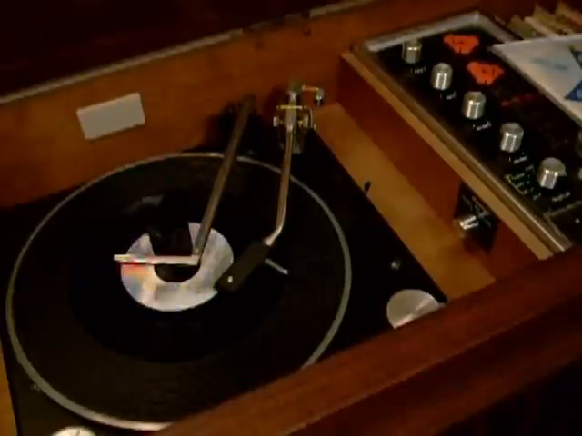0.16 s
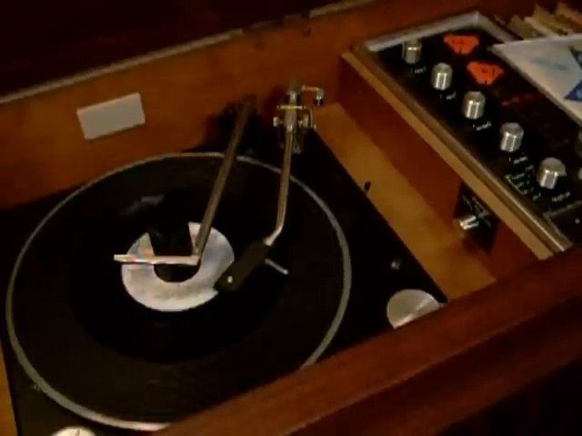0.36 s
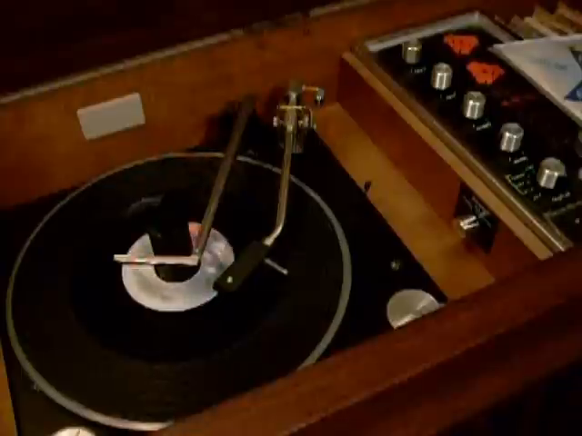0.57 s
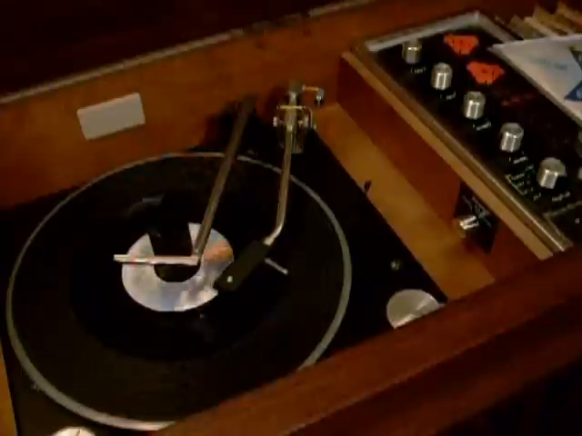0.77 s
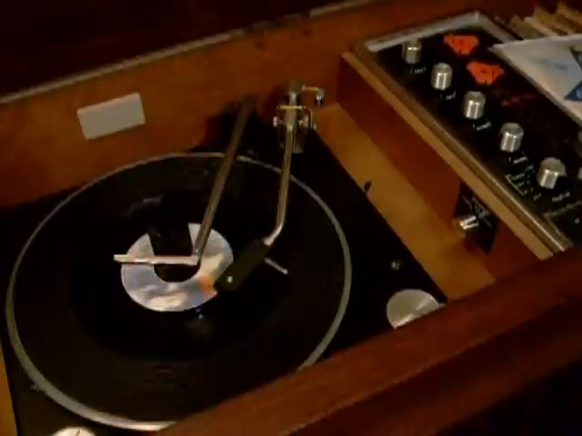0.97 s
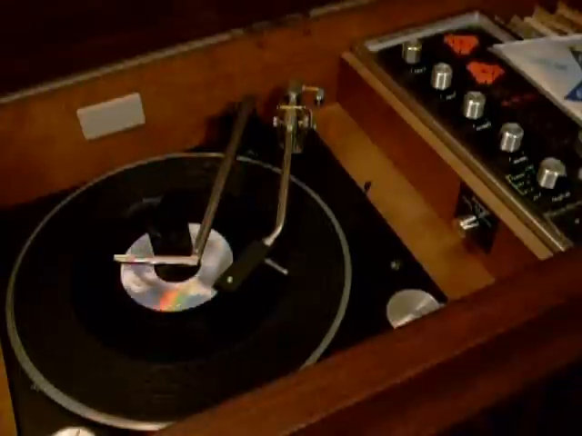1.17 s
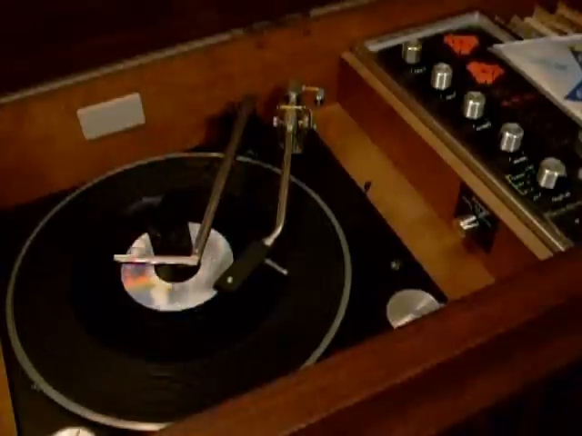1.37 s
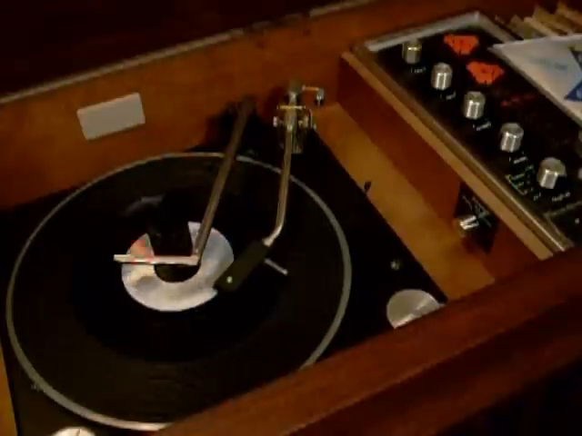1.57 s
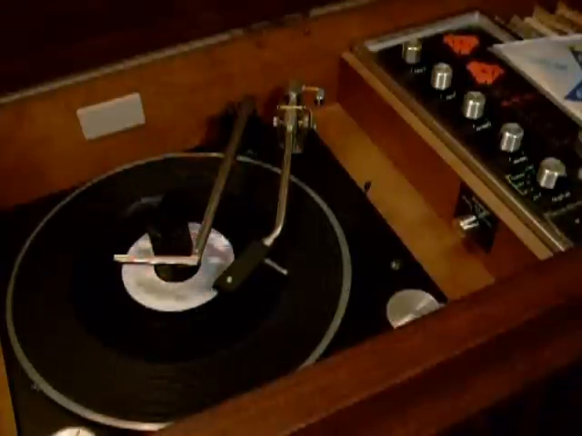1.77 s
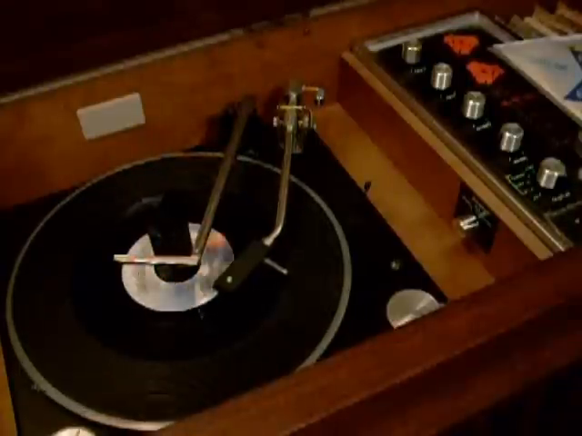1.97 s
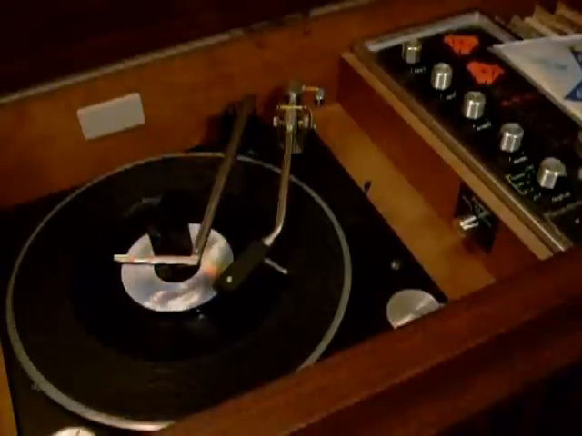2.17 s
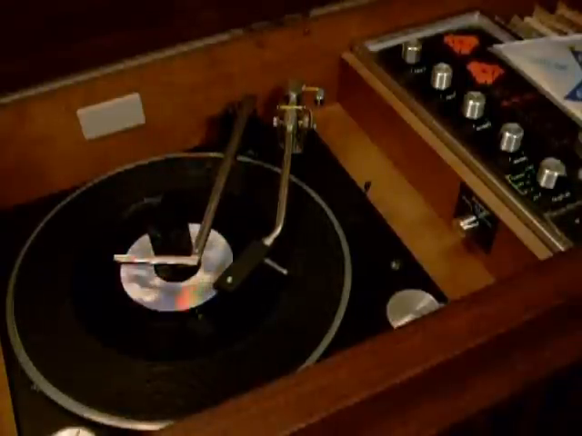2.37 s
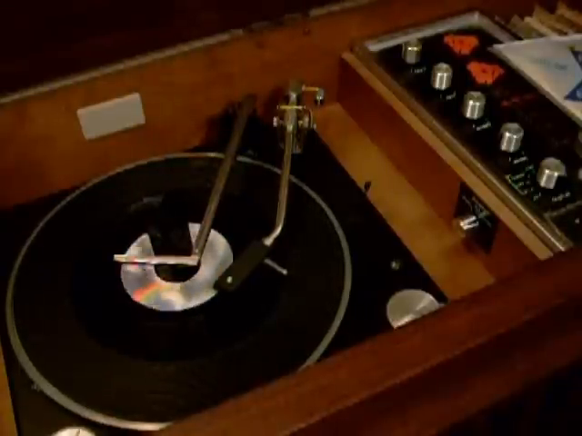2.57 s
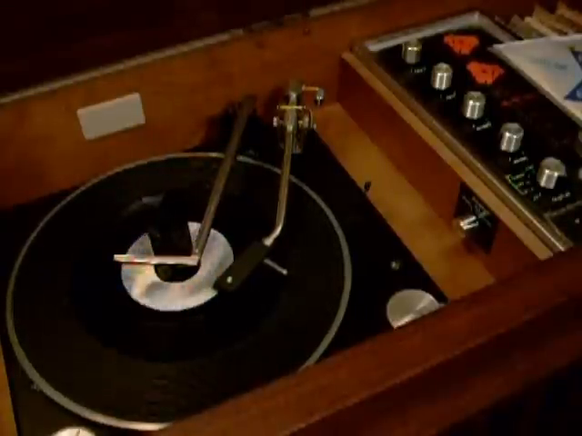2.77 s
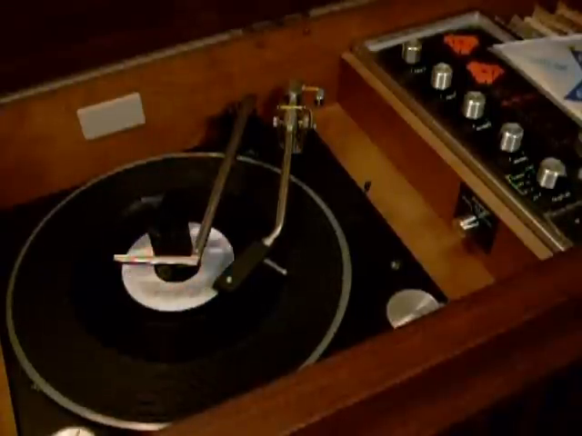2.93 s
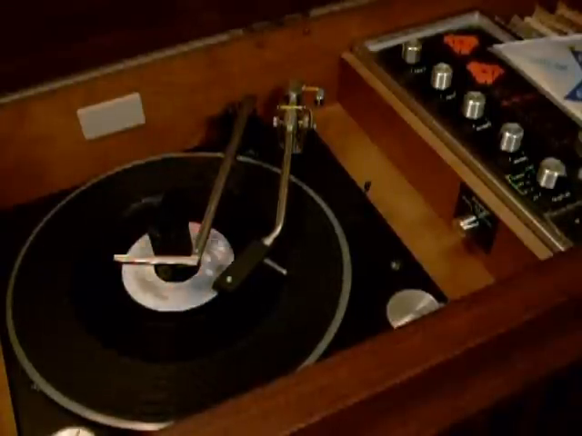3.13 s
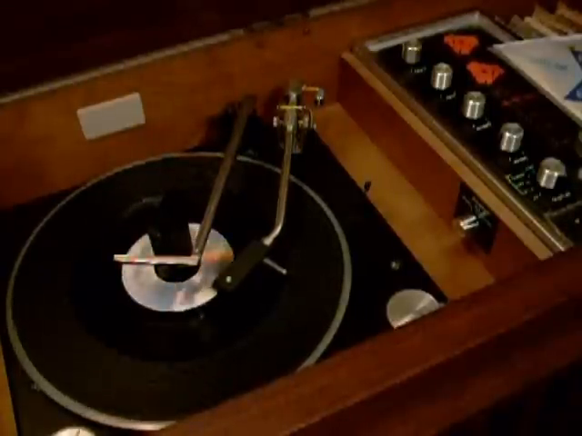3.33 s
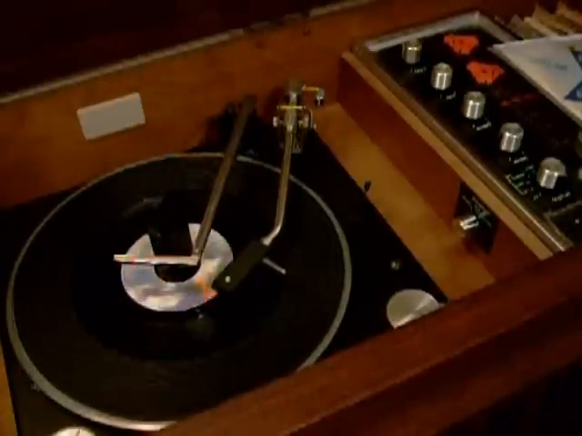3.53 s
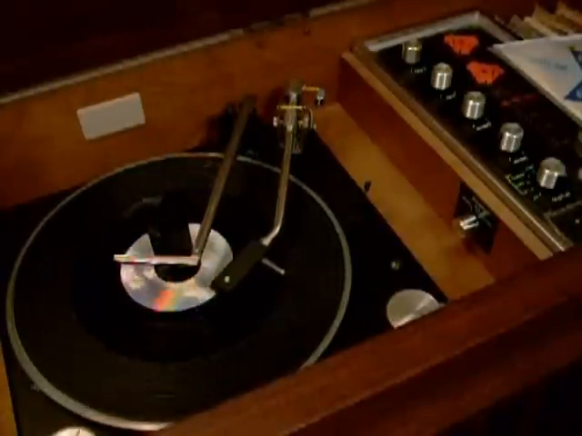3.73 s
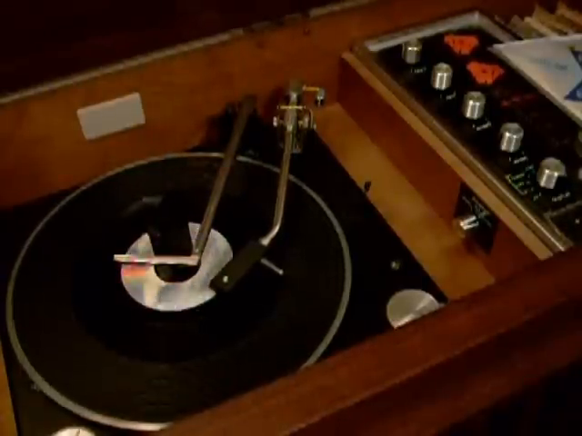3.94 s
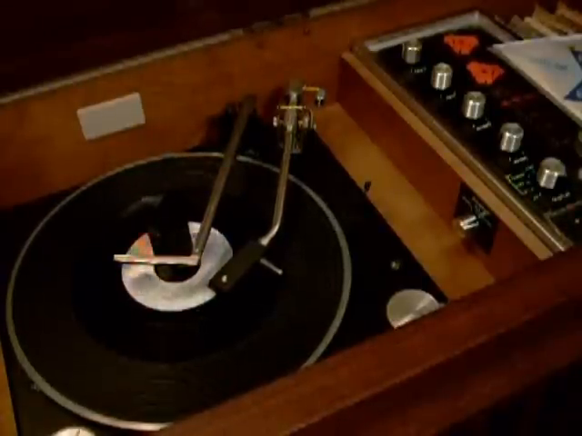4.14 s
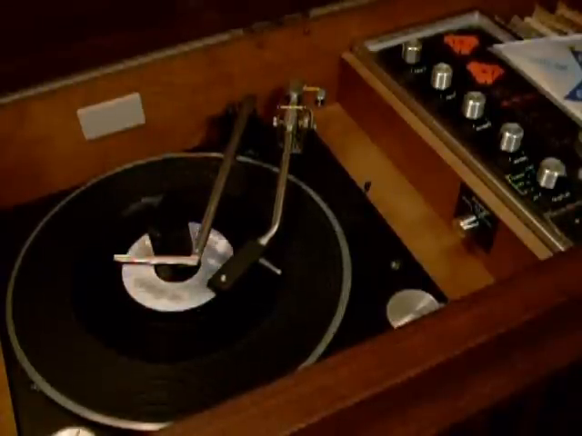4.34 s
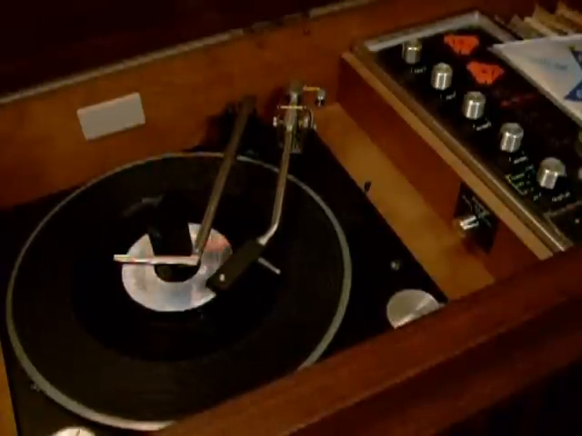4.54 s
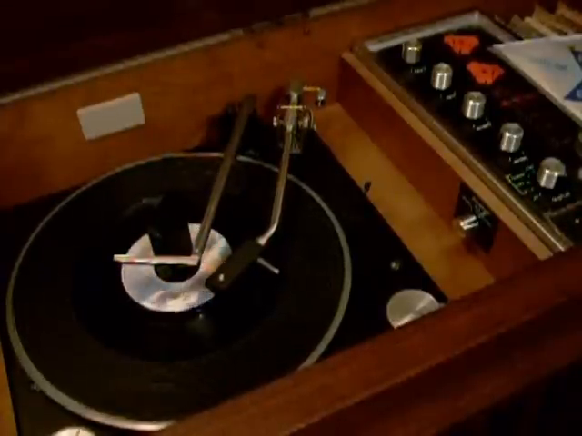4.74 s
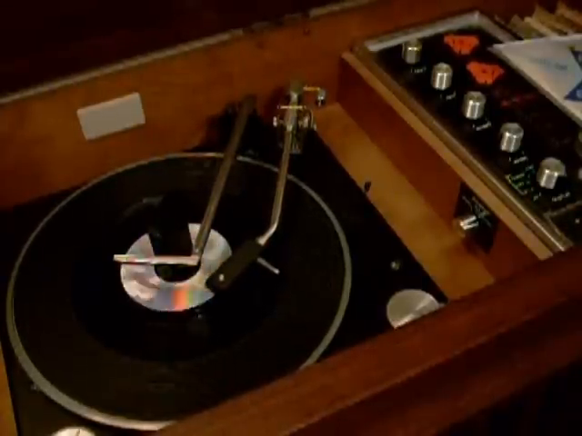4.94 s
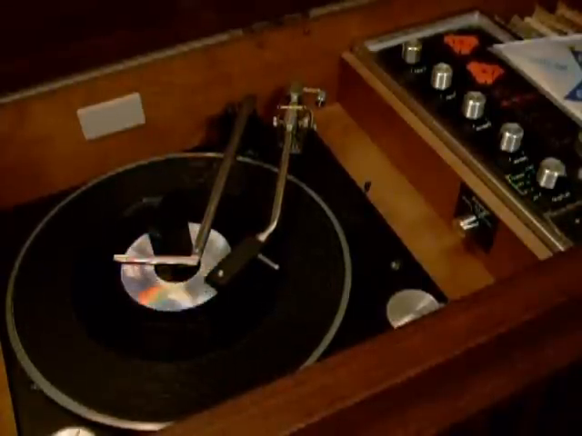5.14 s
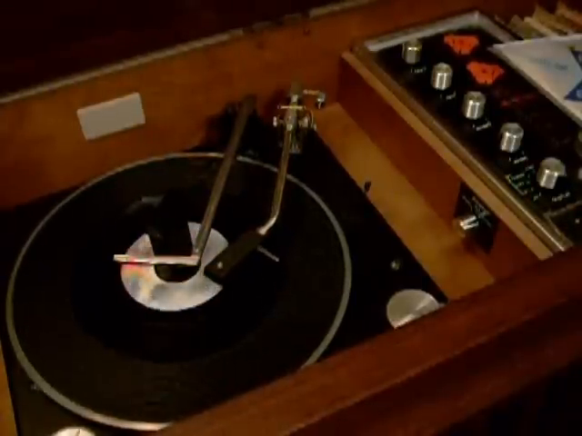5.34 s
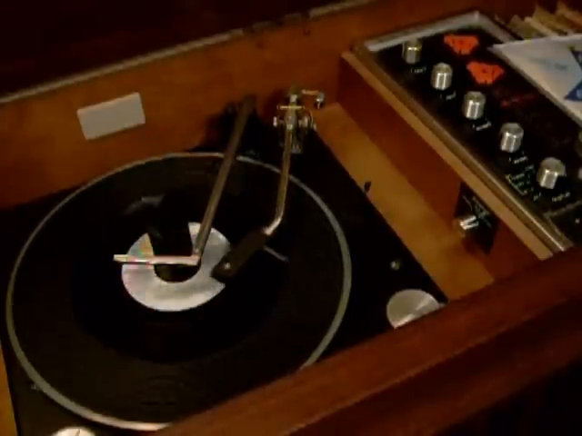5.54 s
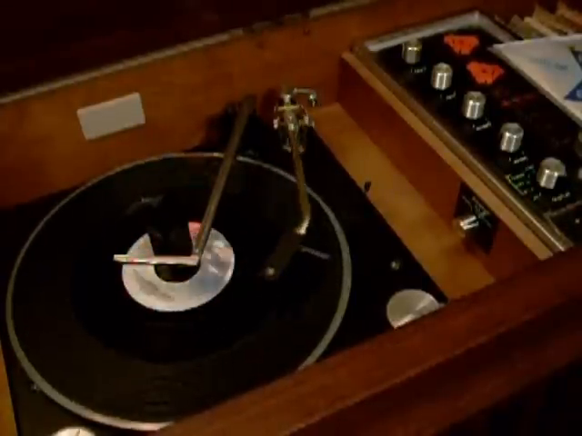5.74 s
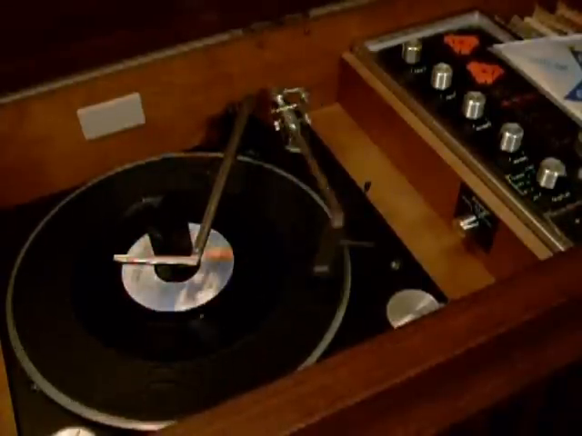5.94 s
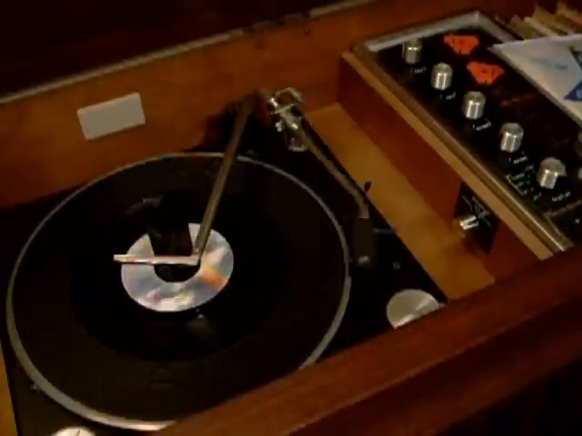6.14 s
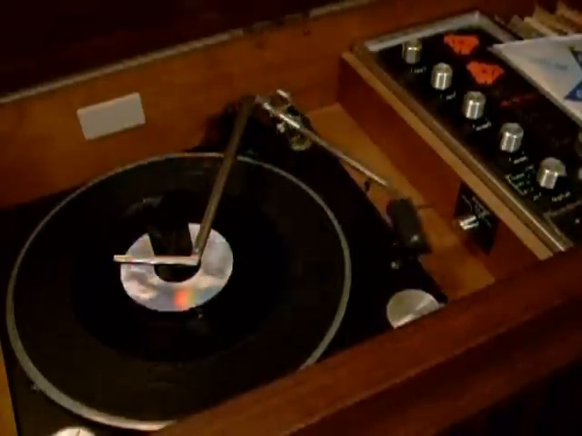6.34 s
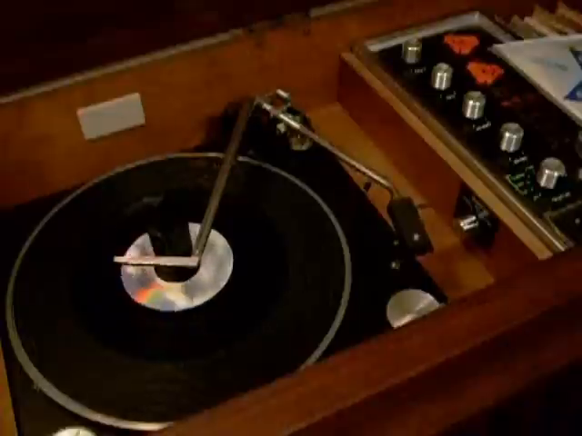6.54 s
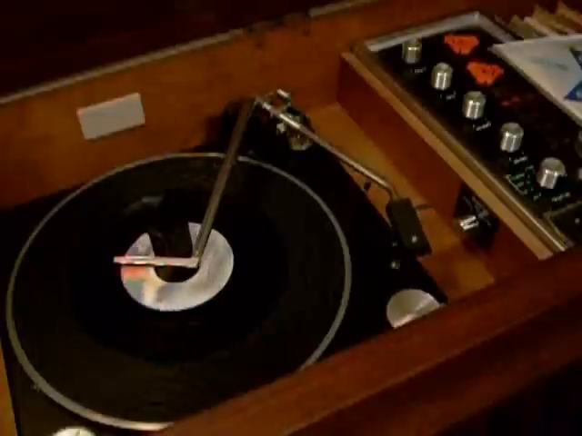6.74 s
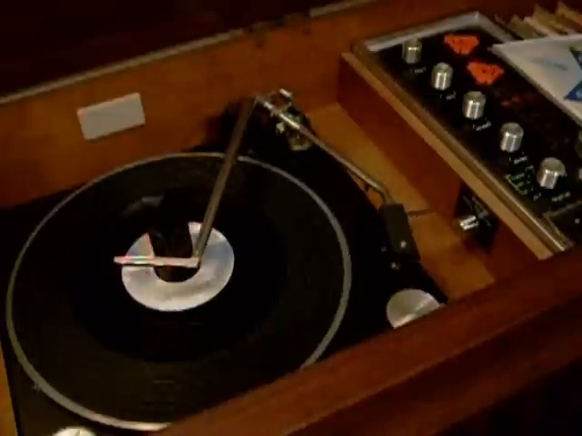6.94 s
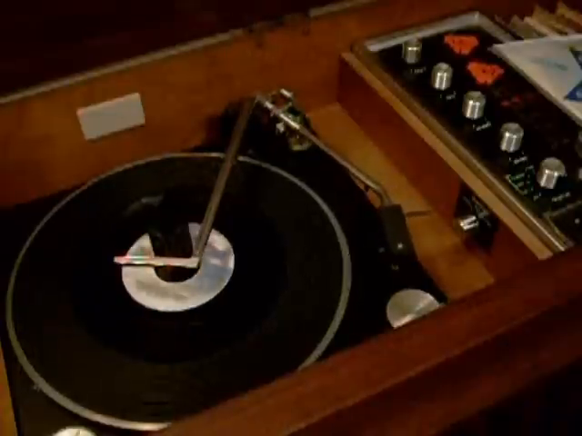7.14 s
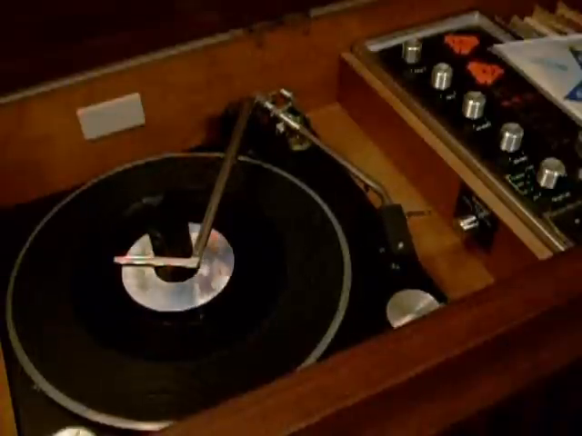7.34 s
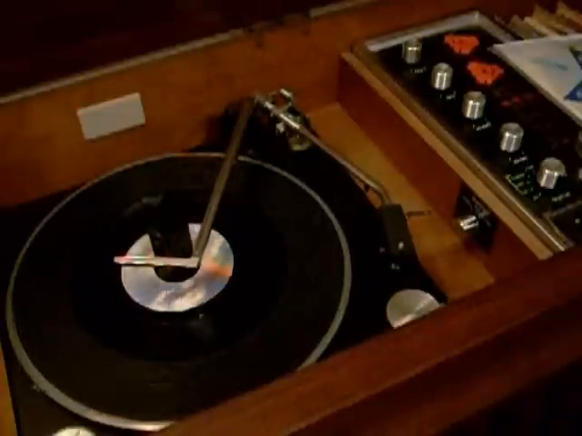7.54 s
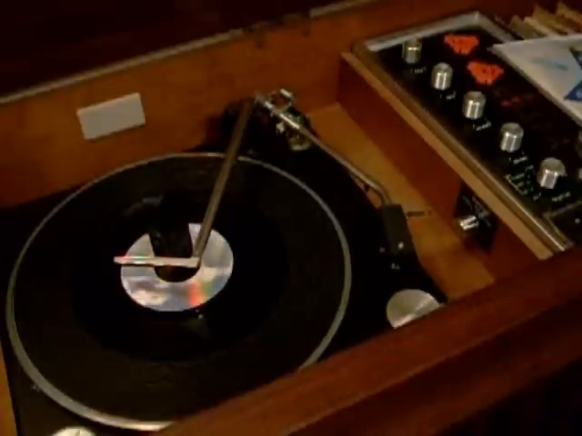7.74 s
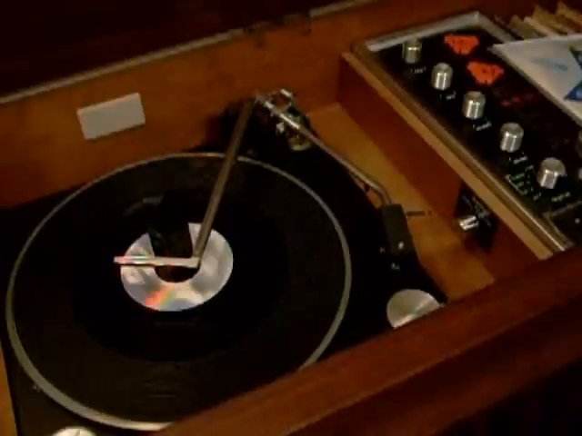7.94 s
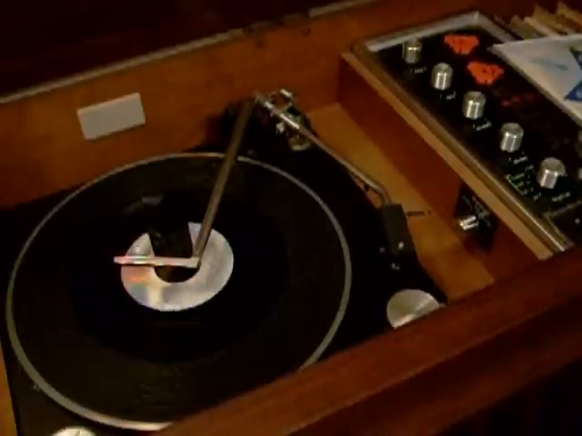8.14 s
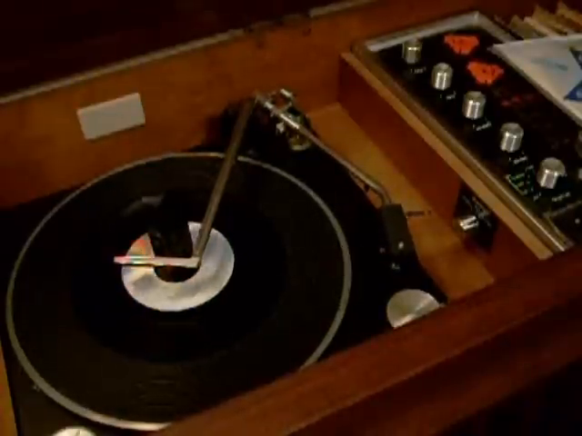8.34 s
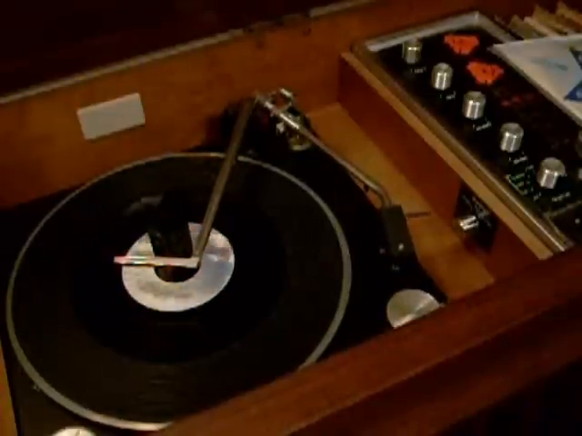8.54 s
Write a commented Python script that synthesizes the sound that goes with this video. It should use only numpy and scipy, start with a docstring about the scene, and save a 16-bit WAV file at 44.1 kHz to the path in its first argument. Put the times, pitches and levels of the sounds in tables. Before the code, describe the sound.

An old turntable finishes a record, heard at close range through its speaker. Low rumble, weak hum and crackly hiss come first, with muffled bumps and stray dust ticks. The rumble grows, then static ticks, a hard pop and a booming bump end it as the stylus lifts. Linkage under the deck clicks sparsely, clatters rapidly, gives a few faint last taps, and leaves thin steady hiss.

```python
"""Beside a record changer, one microphone close to its loudspeaker. The stylus rides the run-out groove:
shaped noise gives rumble, roar and hiss, sines the motor hum, with a few dust ticks and soft thumps.
The rumble swells as the change cycle engages and the stylus pops out of the groove, a spike and a cone swing.
The linkage under the deck clacks while the arm swings back to its rest: short rattles ring the deck modes."""
import sys
import numpy as np
from scipy import signal
from scipy.fft import rfft, irfft
from scipy.io import wavfile
from scipy.ndimage import uniform_filter1d

SR = 44100
rng = np.random.default_rng(int(sys.argv[2]) if len(sys.argv) > 2 else 0)


def volts(x):
    """Linear amplitude factor 10**(x/20) for a level x in dB, scalar or array-like."""
    e = np.asarray(x, float) / 20
    return 10 ** e


def persist_wave(psi):
    """Save psi, clipped to +-1, as 16-bit WAV."""
    counts = np.round(np.clip(psi, -1, 1) * 32767).astype(np.int16)
    wavfile.write(sys.argv[1], SR, np.atleast_2d(counts).T)


N = 379348
TIME_S = np.arange(N) / SR

# dust and static at the stylus:
# (time [s], peak [dB], width [ms], swing back [0-1], step share [0-1])
TICKS = [(2.7210, -31, 0.048, 0.7, 0), (3.1400, -22.5, 0.027, 1.0, 0.6), (4.4148, -15, 0.040, 0.15, 0),
         (4.4238, -19.5, 0.031, 0.9, 0.1), (4.8085, -29, 0.027, 0.7, 0.1)]
# the loud pop, swinging the other way:
# (time [s], peak [dB], width [ms], swing back [0-1], step share [0-1])
POP = (4.6517, -5, 0.061, 0, 0.94)
# jolts of the arm: (time [s], swing level [dB], first swing direction [+1 or -1], start pitch [Hz],
# drive of the cabinet knock before its low-pass [dB], knock delay [ms])
THUMPS = [(1.630, -21, -1, 45.7, -45, 20), (1.904, -15, 1, 61.4, -44, 15), (4.549, -21, -1, 45.4, -26, 21),
          (4.686, -26, -1, 60, -41, 15), (4.4500, -13, 1, 103, -18, 7), (4.9115, -6, -1, 61.3, -27, 7.5)]
# cabinet resonances: (frequency [Hz], level [dB], T60 [s])
CABINET_MODES = [(114, 3, 0.058), (177, -2, 0.1), (231, -5, 0.06), (312, -5, 0.08), (443, -12, 0.04),
                 (590, -14, 0.04), (780, -18, 0.03)]
# linkage contacts: (time [s], blow [dB], weight on the body modes [dB], brightness on the higher modes [dB],
# lower favoured pitch [Hz], higher favoured pitch [Hz]); the struck spot favours these pitches
CLACKS = [(4.917, -46, 3, -8, 800, 2000), (4.937, -46.5, -8, 1, 850, 1983),
          (4.960, -43.5, -12, -8, 680, 2182), (5.347, -43.5, -12, -4.5, 854, 2000),
          (5.473, -39.5, -14, -9, 690, 2000), (5.610, -49, 4, -5, 570, 2000),
          (5.724, -41.5, -6, 2.5, 860, 2200), (5.814, -44, -5, -0.5, 676, 4020),
          (5.823, -43, -6, 2, 910, 3550), (5.9902, -34, -4, -0.5, 830, 2230),
          (6.062, -44, -4, 1, 1056, 3530), (6.0725, -30, -10, -1.5, 890, 2050),
          (6.105, -29, 3.5, -0.5, 497, 690), (6.111, -36.5, -5, 1.5, 1056, 3500),
          (6.154, -43, 0, 2.5, 1000, 2000), (6.165, -38, 3, 0.5, 1056, 3500),
          (6.173, -37, -3.5, -3.5, 1056, 1900), (6.194, -38.5, -7, 2, 1056, 3300),
          (6.198, -29, -3.5, -3, 890, 1983), (6.203, -38.5, 6.5, -13, 565, 1983),
          (6.2207, -36.5, -6, 2.5, 676, 3940), (6.229, -38, -5, -2, 1056, 2182),
          (6.257, -44.5, -3, -1.5, 676, 2000), (6.271, -41, -6, -12, 1056, 2000),
          (6.324, -43, -6, -8, 850, 2000), (6.662, -47.5, -3, -5, 800, 2000),
          (6.719, -50, -4, -7, 1056, 2000), (6.775, -40.5, 1, -0.5, 1056, 3530),
          (6.798, -45, 4, 1, 890, 4020), (6.854, -52.5, -4, -2, 1056, 2000),
          (6.898, -47, -12, -9, 676, 2000)]
# the deck plate and levers, in five groups from low to high: (frequency [Hz], level [dB], T60 [s])
DECK_BODY = [(164.4, -3.5, 0.044), (242, -3.5, 0.05), (327, -6, 0.04), (415, -7, 0.059), (497, -1, 0.066),
             (565, -2.5, 0.044)]
DECK_LOW = [(676, 1, 0.052), (817, -1, 0.033), (890, -0.5, 0.045), (1056, -3, 0.047)]
DECK_MIDDLE = [(1500, -11, 0.034), (1820, -3.5, 0.028), (1983, 0, 0.031), (2070, -5, 0.038),
               (2182, -2.5, 0.039), (2263, -9, 0.05)]
DECK_UPPER = [(3105, 2, 0.014), (3320, -4, 0.022), (3530, -1, 0.012), (3920, -3.5, 0.022),
              (4020, -3.5, 0.017), (4300, -8, 0.024)]
DECK_SNAP = [(8800, 2, 0.0079), (10300, 8, 0.0072), (14000, -10, .006)]
# band that each deck group sounds in, one row a group: (lower edge [Hz], upper edge [Hz])
DECK_BANDS = [(120, 700), (550, 2100), (1500, 2370), (2900, 4370), (7000, 15000)]
# rumble of platter and deck through the stylus, before its uneven lumps: (time [s], level [dB])
RUMBLE_LEVEL = [(0, -32), (0.4, -31), (0.8, -37.5), (1.3, -33.5), (2.1, -42), (3.2, -32.5), (3.8, -22.5),
                (4.3, -24.5), (4.5, -18.5), (4.63, -17.5), (4.72, -21.5), (4.88, -28.5)]
# rumble spectrum: (frequency [Hz], relative level [dB])
RUMBLE_COLOUR = [(10, -1), (18, 0), (32, 3), (50, 1.5), (68, -12.5), (95, -43), (130, -72)]
# low roar spectrum: (frequency [Hz], relative level [dB])
ROAR_COLOUR = [(40, -24), (70, -4.5), (100, 1.5), (150, -4.5), (220, -11.5), (300, -16.5), (500, -33),
               (900, -37.5)]
# hum overtones: (multiple of the hum frequency, level re fundamental [dB])
HUM_PARTIALS = [(1, 1), (2, -10), (3, -19)]
# hiss before its flutter, which the low roar follows: (time [s], level [dB])
HISS_LEVEL = [(0.0, -46.5), (0.6, -46.5), (1.22, -47.5), (1.65, -45), (1.92, -47), (2.45, -49.5),
              (3.3, -49.5), (3.8, -46.5), (4.3, -48.5), (5.1, -49.5), (6.1, -49.5), (6.6, -50),
              (7.42, -49.5), (7.74, -47), (8.2, -48.5), (8.6, -49)]
# hiss spectrum: (frequency [Hz], relative level [dB])
HISS_COLOUR = [(100, 9.5), (300, 17.5), (600, 14), (1260, 10.5), (2500, 7.5), (5000, 4), (10000, -0.5),
               (15400, -4.5), (15650, -45)]
# slow amplifier noise spectrum: (frequency [Hz], relative level [dB])
AMPLIFIER_COLOUR = [(8, -4), (15, 0.5), (35, -7), (70, -13), (110, -36), (200, -64)]


def shaped(points):
    """Noise with the given spectrum, rms 1."""
    hz, db = np.transpose(points)
    bins = np.arange(N // 2 + 1) * SR / N
    gain = volts(np.interp(np.log(bins + 1e-3), np.log(hz), db)) * (bins > 5)
    x = irfft(rfft(rng.standard_normal(N)) * gain, N)
    return x / x.std()


def level_in_time(rows):
    """A level table read at every sample, in dB."""
    s, db = np.transpose(rows)
    return np.interp(TIME_S, s, db)


def drift(rate):
    """Slow chance: random knots of spread 1, rate of them a second, joined by lines."""
    knots = rng.standard_normal(int(N / SR * 40) + 2)
    return np.interp(TIME_S * rate, np.arange(len(knots)), knots)


def ring(clicks, hz, t60):
    """A resonance: a unit click starts a sine of height 1 that dies by 60 dB in t60 seconds."""
    r, w = volts(-60 / (t60 * SR)), 2 * np.pi * hz / SR
    return signal.lfilter([0, np.sin(w)], [1, -2 * r * np.cos(w), r * r], clicks + 1e-18)


def band(x, edges):
    """Keep only what lies between two edges in Hz."""
    return signal.sosfilt(signal.butter(2, edges, "band", fs=SR, output="sos"), x)


def add(out, s, piece):
    """Mix a piece in from time s."""
    i = round(s * SR)
    out[i:i + len(piece)] += piece


def in_groove():
    """1 while the stylus touches the record, falling to 0 once it is clear."""
    clear_s, lift_length_s = 5.0, 0.088
    return np.clip((clear_s - TIME_S) / lift_length_s, 0, 1)


def ticks():
    """A narrow spike, a swing back right after it, and for some a step that the speaker cone rings out."""
    cone_hz, cone_t60_s = 65.6, 0.057
    tip_hz, tip_t60_s, tip_db = 13100, 0.00044, -10
    out = np.zeros(N)
    ms = np.arange(round(.12 * SR)) / SR * 1000 - 1  # 0 is the moment of the tick
    after_s = np.maximum(ms, 0) / 1000
    cone = np.cos(2 * np.pi * cone_hz * after_s + .5) * volts(-60 * after_s / cone_t60_s)
    # the stylus tip rings briefly after a step
    tip = volts(tip_db) * ring(np.diff(ms > 0, prepend=False), tip_hz, tip_t60_s)
    for way, (s, db, width, back, step) in [(1, tick) for tick in TICKS] + [(-1, POP)]:
        lean = np.where(ms > 0, .5 * width, width)  # the stylus drops back faster than it climbs
        spike = np.exp(-(ms / lean) ** 2 / 2)
        swing_back = back * np.exp(-(ms / width - 2.2) ** 2 / 2)
        edge = 1 / (1 + np.exp(-ms / width))
        add(out, s - .001, way * volts(db) * (spike - swing_back + step * (edge * cone - tip)))
    return out


def thumps():
    """A few low cycles that swell, die and sag in pitch as the arm settles; the cabinet knocks along."""
    sag_per_s = 20.4
    knock_ms = 4.7  # how long the knock shakes at full strength
    tail_db, tail_t60_s = -12, 0.32  # the cabinet keeps shaking after a jolt
    out, shaking = np.zeros(N), np.zeros(N)
    t = np.arange(round(.15 * SR)) / SR
    for s, db, way, hz, knock_db, delay_ms in THUMPS:
        rise = t * hz  # the swell tops out where this reaches 1
        swell = (rise * np.exp(1 - rise)) ** 1.4
        turns = hz * np.log1p(sag_per_s * t) / sag_per_s
        add(out, s, way * volts(db) * swell * np.sin(2 * np.pi * turns))
        burst = np.exp(-((1000 * t - delay_ms) / knock_ms) ** 2)
        tail = volts(tail_db - 60 * t / tail_t60_s) * (1000 * t > delay_ms)
        shake = rng.standard_normal(len(t)) * (burst + tail)
        shake[round(delay_ms / 1000 * SR)] = 13.5  # one firm blow amid the shaking
        shake = volts(knock_db) * shake / np.linalg.norm(shake)
        # slower jolts knock duller
        add(shaking, s, signal.lfilter(*signal.butter(1, 13 * hz, fs=SR), shake))
    for k, (hz, db, t60) in enumerate(CABINET_MODES):
        out += (-1) ** k * volts(db) * ring(shaking, hz, t60)
    return out


def rattles():
    """One short rattle of tiny impacts per contact, of energy 1, as one deck mode feels it."""
    rise_ms, length_ms = 1.9, 5.3
    tail_db, tail_ms = -16.5, 25
    ms = np.arange(round(.08 * SR)) / SR * 1000
    size = len(CLACKS), len(ms)
    grit = rng.standard_normal(size) * (rng.random(size) < .15)
    grit *= 1 - np.exp(-ms / rise_ms)  # the rattle builds up before it dies
    grit[:, round(.0012 * SR)] = 6.0  # the firmest impact comes just after the first touch
    # the rattle dies fast, loose levers keep trembling a little longer
    bursts = grit * (np.exp(-(ms / length_ms) ** 1.3) + volts(tail_db) * np.exp(-ms / tail_ms))
    return bursts / np.linalg.norm(bursts, axis=1, keepdims=True)


def linkage():
    """Metal contacts under the deck: each one's rattle drives five groups of deck modes."""
    scatter_db = 1.5
    favour_db, favour_width = 6.0, .05  # modes near a favoured pitch ring louder; width as a share of pitch
    out = np.zeros(N)
    times, blow, weight, bright, *favoured = np.transpose(CLACKS)
    groups = [
        (DECK_BODY, blow + weight),
        (DECK_LOW, blow),
        (DECK_MIDDLE, blow + bright),
        (DECK_UPPER, blow - 1 + 1.6 * bright),  # brightness counts more here
        (DECK_SNAP, 2 * (blow + weight) + 13),  # the brightest modes grow with the square of the blow
    ]
    for (modes, level), edges in zip(groups, DECK_BANDS):
        group = np.zeros(N)
        for k, (hz, mode_db, t60) in enumerate(modes):
            drive = np.zeros(N)
            scatter = rng.normal(0, scatter_db, len(CLACKS))
            distance = np.log(hz / np.array(favoured)) / favour_width
            near = favour_db * np.exp(-distance ** 2).max(axis=0)
            for s, db, burst in zip(times, level + scatter + near, rattles()):
                add(drive, s, volts(db + mode_db) * burst)
            group += (-1) ** k * ring(drive, hz, t60)
        out += band(group, edges)  # little sound between the groups
    return out


def rumble_shake():
    """How hard platter and deck shake the stylus: the rumble level, gone once the groove is left."""
    return volts(level_in_time(RUMBLE_LEVEL)) * in_groove()


def rumble():
    """Low noise of platter and deck through the stylus, in uneven lumps."""
    noise = shaped(RUMBLE_COLOUR)
    # partly even out the noise's own swells, so that the level table sets the loudness
    power = uniform_filter1d(noise ** 2, size=SR // 25)
    noise = noise / (power + 0.016) ** (0.46 / 2)
    return rumble_shake() * volts(2.0 * drift(6.7)) * noise / noise.std()


def roar():
    """Low noise: a steady part that follows the hiss level, and a part shaken up by the rumble."""
    hiss_db = level_in_time(HISS_LEVEL)
    steady = volts(-45 + 1.1 * (hiss_db - hiss_db.mean()))
    shaken = volts(-27) * rumble_shake()
    return np.hypot(steady, shaken) * shaped(ROAR_COLOUR)


def hum():
    """Motor hum through the stylus: twice mains frequency and overtones, wavering in level and phase."""
    hum_hz, hum_db = 120, -45
    cycle_s, fundamental_fade_db_per_s = 3.2, 4  # the hum sinks once the cycle loads the deck
    phase = 2 * np.pi * hum_hz * TIME_S + 0.14 * drift(1.98)
    fade_db = fundamental_fade_db_per_s * np.maximum(TIME_S - cycle_s, 0)
    tone = np.zeros(N)
    for k, db in HUM_PARTIALS:
        # the fundamental fades fastest
        tone += volts(db - fade_db / k + 1.0 * drift(3.08)) * np.sin(k * phase)
    return np.sqrt(2) * volts(hum_db) * in_groove() * tone


def hiss():
    """Broad hiss, strongest near 300 Hz and falling towards the treble, fluttering at three speeds; crackle."""
    specks_per_s, crackle_db = 60, 8.5
    flutter_db = 0.51 * drift(9) + 0.74 * drift(20) + 0.83 * drift(39)
    noise = volts(flutter_db) * shaped(HISS_COLOUR)
    # fine crackle: random specks, band-passed
    speck_size = volts(3.75 * np.minimum(rng.exponential(1, N), 4))
    specks = (rng.random(N) < specks_per_s / SR) * speck_size * rng.choice([-1, 1], N)
    crackle = band(specks, [3500, 15400])
    return volts(level_in_time(HISS_LEVEL)) * (noise + volts(crackle_db) * crackle)


def amplifier():
    """Slow flicker noise of the amplifier, which stays when the groove is left."""
    return volts(-30.5) * shaped(AMPLIFIER_COLOUR)


def scene():
    """Everything reaches one microphone."""
    events = ticks() + thumps() + linkage()
    background = rumble() + roar() + hum() + hiss() + amplifier()
    return (events + background)[None]


def roll_off(x):
    """The treble ends steeply here."""
    return signal.sosfilt(signal.butter(12, 16520, fs=SR, output="sos"), x)


def record(dry):
    """The microphone signal loses its extreme top in a steep low-pass."""
    top_hz = 16800
    mix = signal.sosfilt(signal.cheby2(10, 50, top_hz, fs=SR, output="sos"), dry)
    return roll_off(mix)


dry = scene()
out = record(dry)
persist_wave(out)
```